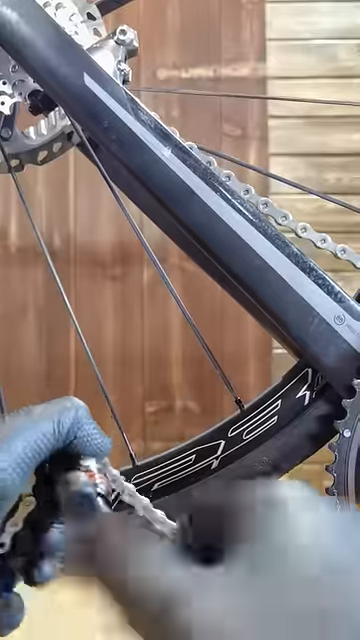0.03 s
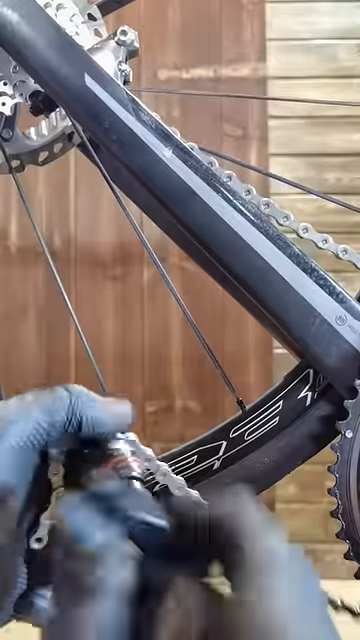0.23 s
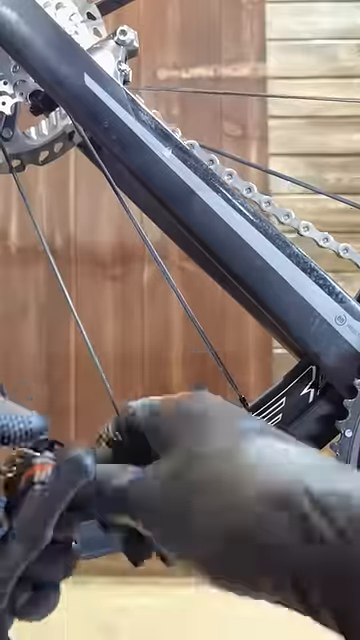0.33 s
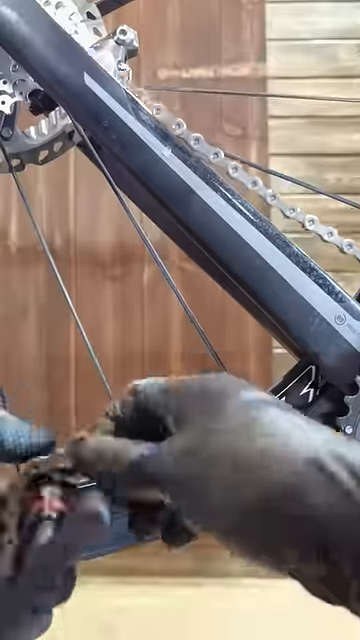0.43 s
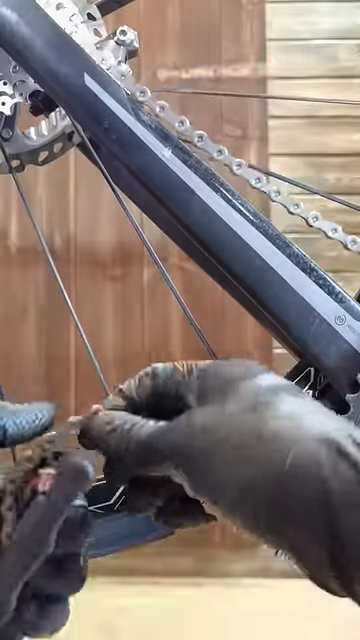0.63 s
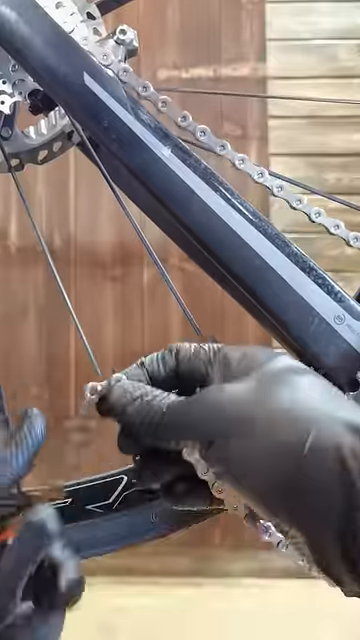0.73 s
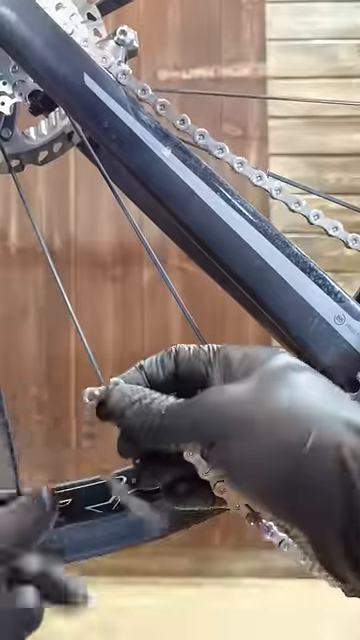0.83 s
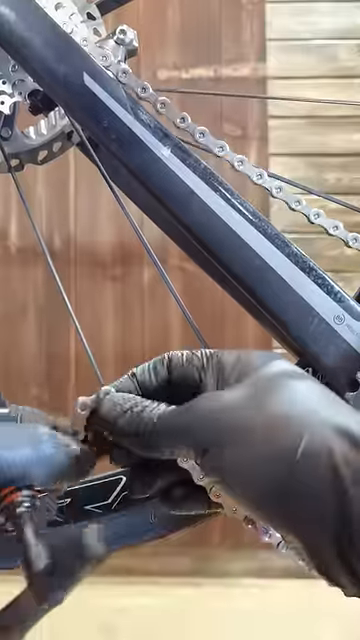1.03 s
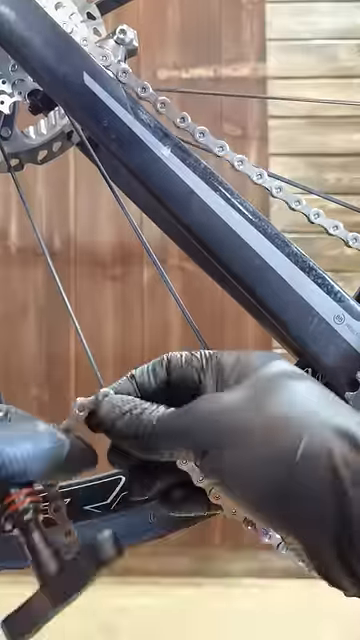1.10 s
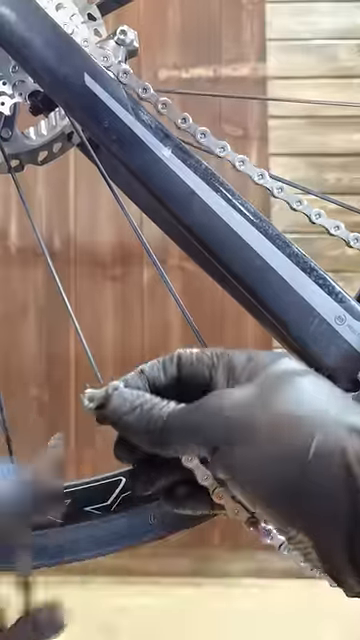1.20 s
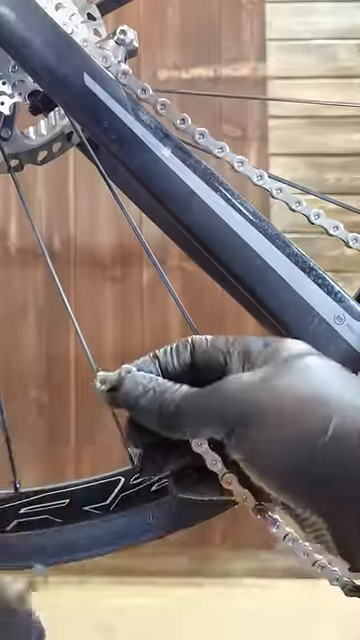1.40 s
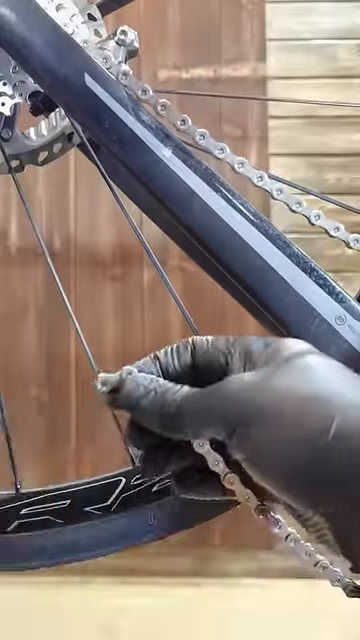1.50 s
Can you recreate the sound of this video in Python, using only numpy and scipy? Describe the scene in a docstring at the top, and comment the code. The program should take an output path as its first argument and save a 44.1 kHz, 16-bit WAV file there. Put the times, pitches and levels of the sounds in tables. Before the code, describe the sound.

A bicycle chain clacks sharply off a steel tool, then loose links tick faintly.

```python
"""A sharp clack, close by in a sheltered yard, as a bicycle chain snaps out of a steel chain tool.
The chain knocks the tool again and rattles off it; then loose links tick and gloves rub over the metal.
Each impact excites the resonant modes of the steel, while sliding friction makes a fine, gritty hiss.
The yard returns a short echo. Behind it a low hum swells and fades over faint rumble, drone and air."""
import sys
import numpy as np
from scipy import signal
from scipy.fft import rfft, irfft
from scipy.io import wavfile
from scipy.ndimage import uniform_filter1d

SR = 44100
rng = np.random.default_rng(int(sys.argv[2]) if len(sys.argv) > 2 else 0)


def unload_audio(sound):
    """Save the sound as a 16-bit wav file, at the path given as the first command line argument."""
    columns = np.transpose(np.atleast_2d(sound))
    # keep every value between -1 and 1, then stretch to whole-number steps
    steps = np.round(np.clip(columns, -1, 1) * 32767)
    wavfile.write(sys.argv[1], SR, steps.astype(np.int16))


N = 68355
TIME = np.arange(N) / SR
FREQS, SCENE_FREQS = np.fft.rfftfreq(4096, 1 / SR), np.fft.rfftfreq(N, 1 / SR)

# Spectrum of the outdoor air. Each row: frequency in Hz, relative spectral density in dB.
AIR_SPECTRUM = [(10, -2.5), (30, -0.5), (75, 0.5), (140, -6.5), (230, -6), (340, -10.5), (440, -9),
                (620, -16), (1000, -24.5), (2000, -29.5), (5000, -31), (16000, -34)]
# Envelopes of the air, the hum and the drone. Each row: time in seconds, relative level in dB.
AIR_ENVELOPE = [(0, -56.5), (.3, -61), (.55, -60), (.9, -64.5), (1.3, -62), (1.55, -63.5)]
HUM_ENVELOPE = [(0.0, -58.5), (0.056, -51), (0.09, -65.5), (0.164, -57), (0.202, -69.5), (0.224, -63),
                (0.43, -70), (0.556, -52), (0.69, -66), (0.75, -85), (0.798, -65.5), (0.876, -73.5),
                (0.936, -67), (0.984, -95), (1.074, -62), (1.16, -54.5), (1.364, -56.5), (1.55, -63)]
DRONE_ENVELOPE = [(0, -65), (.35, -77.5), (.5, -68.5), (.85, -72.5), (1.1, -77.5), (1.55, -73.5)]
# Reverberation time of the yard. Each row: frequency in Hz, T60 in seconds.
YARD_T60 = [(300, 0.14), (1500, 0.097), (4000, 0.41), (9000, .2), (16000, 0.099)]
# Strength of the yard's echo. Each row: frequency in Hz, gain in dB.
YARD_GAIN = [(300, 8.5), (1500, -7.5), (4000, -17.5), (9000, -16), (16000, -24)]
# Reflections off hands and frame. Each row: nominal delay in seconds, amplitude ratio.
NEAR_ECHOES = [(.0013, 0.28), (.0029, 0.21), (.0047, .22)]
# Colour shared by all metal contacts. Each row: frequency in Hz, gain in dB.
METAL_COLOUR = [(100, -33), (330, -21), (500, 6.5), (650, -2), (900, 2), (1400, -2), (1900, 2), (2300, 0.5),
                (3200, -2.5), (4600, -0.5), (5250, -6), (5700, -3), (8000, -6), (10700, -1.5), (11800, -7),
                (15500, -4)]
# Strokes of sliding chain and gloves.
# Each row: start in seconds, length in seconds, level in dB, centre in Hz, width in octaves.
SLIDES = [(-.02, 0.12, -56.5, 3000, 1.88), (0.038, 0.035, -55.5, 7460, 1), (0.06, 0.13, -62, 2830, 1.8),
          (0.176, 0.014, -48.5, 4030, 1.2), (0.186, 0.027, -45.5, 4116, 1.6),
          (0.256, 0.071, -44.5, 7000, 2.6), (0.278, 0.032, -41.5, 4960, 1.3),
          (.367, 0.041, -56.5, 5100, 3.7), (0.431, 0.1, -64, 8000, 1.32), (.655, 0.056, -60.5, 10420, 1.3),
          (0.798, 0.057, -64, 7940, 1.22), (0.869, 0.14, -70.5, 8020, 3.9),
          (1.004, 0.053, -54.5, 3200, 1.09), (1.034, 0.044, -60, 4920, 1.6),
          (1.084, 0.073, -60, 8850, 1.11), (1.504, 0.12, -70.5, 2194, 1.08)]
# Dull knocks of the tool in the hand. Each row: start in seconds, level in dB, pitch in Hz.
KNOCKS = [(.108, -53.5, 1800), (.183, -55, 1164), (.2405, -40.5, 2000), (.349, -58.5, 1960),
          (1.179, -54, 1996), (1.218, -52.5, 2296)]
# Modes of the gripped tool. Each row: ratio to the pitch, level in dB, time constant in seconds.
KNOCK_MODES = [(.40, -5, 0.0031), (.68, -11.5, 0.0024), (1, -2, 0.0026), (1.12, -6.5, .0015)]
# Modes of a loose link. Each row: frequency in Hz, level in dB, T60 in seconds.
LINK_MODES = [(2800, -14, 0.038), (4370, -20, 0.11), (5750, -5, .03), (7520, -13, .04), (9200, -4, 0.024),
              (10180, -8, 0.044), (11400, -13, .14), (13590, -6.5, 0.029)]
# Mode frequencies of tool and chain, in Hz.
STEEL_HZ = [510, 1020, 1180, 1667, 2033, 2372, 2840, 2877, 3290, 3628, 4267, 4447, 4930, 5655, 6655, 6895,
            7700, 7975, 8560, 9570, 10550, 10803, 13135, 14900]
# Ringing of those modes, in the same order. Each row: level in dB, T60 in seconds.
STEEL_RING = [(-55.5, 0.079), (-31, 0.053), (-38, 0.19), (-38.5, 0.053), (-32.5, 0.061), (-40.5, 0.13),
              (-34.5, 0.14), (-39, 0.13), (-33.5, 0.022), (-33.5, 0.068), (-29, 0.019), (-39, 0.076),
              (-29, 0.026), (-27.5, 0.031), (-27, 0.01), (-25.5, .035), (-23.5, 0.075), (-30, 0.068),
              (-29.5, 0.043), (-21.5, 0.049), (-20.5, 0.01), (-27.5, 0.043), (-25.5, 0.012), (-32.5, 0.045)]
STEEL_MODES = [(hz, db, t60) for hz, (db, t60) in zip(STEEL_HZ, STEEL_RING)]
# Contacts of loose links, and of the chain on the tool.
# Each row: start in seconds, level in dB, centre in Hz, width in octaves, chatter decay in seconds.
LINK_TICKS = [(.059, -46.5, 5230, 0.32, 0.006), (.4035, -44, 7440, 0.56, 0.0013),
              (.447, -51.5, 11030, 0.64, 0.0034), (.475, -48, 7850, .8, 0.0015),
              (.495, -52, 6040, 0.66, 0.0018), (.525, -59, 10150, 0.044, .008),
              (.642, -47, 9120, .6, 0.0043), (.6472, -38.5, 9960, 0.24, 0.0024),
              (.653, -49, 11900, 0.13, 0.0031), (.653, -57.5, 3040, 0.16, 0.018),
              (.6878, -43, 9090, 0.41, 0.0028), (.695, -56, 8000, 1.13, .002),
              (.7215, -45, 8060, 0.43, 0.0035), (.723, -53.5, 14700, .2, .003),
              (.850, -48, 6990, 0.37, .0015), (.857, -56, 7970, 0.57, 0.0017),
              (.929, -63.5, 5000, 1.56, .002), (1.024, -52, 4270, 0.34, 0.0058),
              (1.064, -55.5, 4463, 1.46, 0.0015), (1.173, -53.5, 14000, 0.73, 0.011)]
CHAIN_CLACKS = [(.1993, -30.5, 5640, 1.3, 0.012), (.2026, -20.5, 13400, 1.05, 0.0033),
                (.2045, -14.5, 8140, 0.81, 0.0019), (.2060, -14.5, 9214, 1.31, 0.0028),
                (.2077, -20, 3043, 1.6, 0.0016), (.2090, -16.5, 6955, 1.6, 0.0026),
                (.2106, -25.5, 2600, 1.2, 0.0019), (.2805, -27.5, 3070, 1.7, 0.00035),
                (.2812, -28, 1670, 0.53, .0007), (.2822, -33, 14850, 0.24, 0.0016),
                (.2841, -29, 7160, 0.42, 0.0041), (.2893, -18.5, 3790, 0.69, 0.0003),
                (.2902, -35.5, 1110, 2.05, 0.0081), (.302, -35, 10500, 0.045, 0.0032),
                (.313, -36, 8600, 0.67, 0.0026), (.3225, -39, 6040, 0.91, 0.001)]
# Hard blows that ring the tool. Each row: start in seconds, level in dB, centre in Hz, width in octaves.
HARD_BLOWS = [(.2050, -1, 7000, 3.7), (.2893, -7.5, 1700, 0.58)]


def amp(db):
    """Amplitude ratio of a level in decibels."""
    return 10 ** (np.asarray(db) / 20)


def unit(x):
    """Normalisation to unit RMS."""
    return x / np.sqrt(np.mean(x ** 2) + 1e-20)


def envelope(points):
    """Amplitude over time, interpolated in decibels."""
    return amp(np.interp(TIME, *np.transpose(points)))


def curve_at(points, hz):
    """Interpolation on a logarithmic frequency axis."""
    f, value = np.transpose(points)
    return np.interp(np.log(hz + 1), np.log(f + 1), value)


def bell(f, hz, octaves):
    """Gaussian passband in log frequency, centred on hz."""
    return np.exp(-.5 * (np.log2((f + 1) / hz) / octaves) ** 2)


def add(mix, start, sound):
    """Superposition of a stereo sound on the mix, from a start in seconds."""
    at = round(start * SR)
    sound = sound[:, max(-at, 0):]
    part = mix[:, max(at, 0):][:, :sound.shape[1]]
    part += sound[:, :part.shape[1]]


def colour(x, gain):
    """Minimum-phase filtering by a gain over FREQS, normalised to unit power."""
    log_gain = np.log(np.maximum(unit(gain), 1e-4))
    log_response = signal.hilbert(np.r_[log_gain, log_gain[-2:0:-1]]).conj()
    taps = np.fft.ifft(np.exp(log_response)).real
    return signal.fftconvolve(x, taps[None], axes=1)


def stereo_noise(size, bass_coherence=0.84, corner_hz=2200):
    """Interaural coherence falls with frequency: noise alike in the bass, unrelated in the treble."""
    left, independent = rfft(rng.standard_normal((2, size)))
    coherence = bass_coherence / (1 + (np.fft.rfftfreq(size, 1 / SR) / corner_hz) ** 2)
    right = coherence * left + np.sqrt(1 - coherence ** 2) * independent
    return irfft(np.array([left, right]), size)


def shaped_noise(gain):
    """Spectral shaping of stereo noise by a gain over SCENE_FREQS, at unit RMS."""
    return unit(irfft(rfft(stereo_noise(N)) * gain, N))


def air():
    """Broadband outdoor noise whose spectral density falls toward the treble."""
    return envelope(AIR_ENVELOPE) * shaped_noise(amp(curve_at(AIR_SPECTRUM, SCENE_FREQS)))


def rumble(stereo_width=.35):
    """Deep narrowband noise; a small interaural difference keeps it near the centre."""
    band = amp(-64.5) * shaped_noise(bell(SCENE_FREQS, hz=48, octaves=.14))
    mid = band.mean(0)
    return mid + stereo_width * (band - mid)


def drone():
    """Noise confined to a very narrow band is heard as a faint pitch."""
    return envelope(DRONE_ENVELOPE) * shaped_noise(bell(SCENE_FREQS, hz=428, octaves=.03))


def hum(pitch_hz=109.1, waver=0.004, fundamental_gain_db=2, overtone_db=-77.5):
    """Slow random frequency modulation makes a swelling low tone and its faint octave waver."""
    drift = unit(irfft(rfft(rng.standard_normal(N)) * bell(SCENE_FREQS, hz=5, octaves=0.94), N))
    phase = 2 * np.pi * np.cumsum(pitch_hz * (1 + waver * drift)) / SR
    fundamental = amp(fundamental_gain_db) * envelope(HUM_ENVELOPE) * np.sin(phase)
    return np.sqrt(2) * (fundamental + amp(overtone_db) * np.sin(2 * phase))


def yard_echo(x, rise_s=.004):
    """Diffuse reverberation from fence and shed: each band decays exponentially at its own rate."""
    hz, t, bands = signal.stft(stereo_noise(16384), SR, nperseg=256)
    t60 = curve_at(YARD_T60, hz)[:, None]
    decay = amp(curve_at(YARD_GAIN, hz)[:, None] - 60 * t / t60)
    energy_scale = np.sqrt(2 * np.log(1000) / (t60 * SR))  # long and short decays carry equal energy
    tail = signal.istft(bands * decay * energy_scale, SR, nperseg=256)[1]
    tail *= np.minimum(TIME[:tail.shape[1]] / rise_s, 1)
    return signal.fftconvolve(x, tail, axes=1)[:, :N]


def with_reflections(x, delay_spread=0.17):
    """Early reflections off hands and frame join the direct sound, by a different path to each ear."""
    out = x.copy()
    for delay, share in NEAR_ECHOES:
        for ear in np.eye(2):
            add(out, delay * (1 + delay_spread * rng.uniform(-0.79, 1)), share * ear[:, None] * x)
    return out


def metal_response(modes, half_width_hz=44, widening=0.011, valley_db=-4):
    """Resonance gives a metal part's gain over FREQS a Lorentzian peak at each mode."""
    peaks = sum(1 / (1 + ((FREQS - hz) / (half_width_hz + widening * hz)) ** 2) for hz, _, _ in modes)
    return amp(curve_at(METAL_COLOUR, FREQS)) * np.sqrt(peaks + amp(valley_db) ** 2)


def slides(catches_per_s=1000, spread_db=0.5, hiss=0.66, size=8192):
    """Sliding friction: dense tiny catches and a hiss drive the resonances of the steel."""
    out, response = np.zeros((2, N)), metal_response(STEEL_MODES)
    for start, length, db, hz, octaves in SLIDES:
        catches = rng.random(size) < catches_per_s / SR
        strength = amp(spread_db * np.minimum(rng.exponential(1, size), 4))
        grit = unit(catches * strength * rng.standard_normal((2, size)))
        friction = unit(grit + hiss * stereo_noise(size))
        stroke = np.sin(np.pi * np.minimum(TIME[:size] / length, 1))
        add(out, start, amp(db) * colour(friction * stroke, bell(FREQS, hz, octaves) * response))
    return out


def pulse(t, peak_s):
    """Critically damped envelope: it rises to one at peak_s, then dies away."""
    return t / peak_s * np.exp(1 - t / peak_s)


def knocks(rub_db=-7.5, rub_s=.003):
    """Damping: the gripped tool's modes die quickly, leaving a dull knock with a short rub."""
    out, t = np.zeros((2, N)), TIME[:2048]
    for start, db, hz in KNOCKS:
        tone = sum(amp(level) * pulse(t, peak_s) * np.sin(2 * np.pi * hz * ratio * t)
                   for ratio, level, peak_s in KNOCK_MODES)
        add(out, start, amp(db) * np.array([tone, tone]))
        rub = stereo_noise(len(t)) * pulse(t, rub_s)
        add(out, start, amp(db + rub_db) * colour(rub, bell(FREQS, 0.59 * hz, octaves=.5)))
    return out


def contacts(hits, modes, crack=0.12, rise_s=.0003):
    """Forced response: a crack and a brief chatter of steel on steel pass through the resonances."""
    out, t, response = np.zeros((2, N)), TIME[:2048], metal_response(modes)
    for start, db, hz, octaves, decay in hits:
        chatter = stereo_noise(len(t)) * np.exp(-t / decay) * (1 - np.exp(-t / rise_s))
        chatter /= np.linalg.norm(chatter, axis=1, keepdims=True)
        chatter[:, 0] += crack  # impulse at first touch
        chatter *= np.sqrt(decay * SR / 2)  # longer chatter carries more energy
        add(out, start, amp(db) * colour(chatter, bell(FREQS, hz, octaves) * response))
    return out


def ringing(hits, modes, rise_s=0.0014, left_ear_delay_s=.00005):
    """Free vibration: each hit leaves the modes near its centre frequency as decaying sinusoids."""
    out = np.zeros((2, N))
    t = np.maximum(TIME[:SR // 2] - np.array([[left_ear_delay_s], [0]]), 0)
    for start, db, centre, octaves, *_ in hits:
        tone = sum(bell(hz, centre, octaves) * amp(level - 60 * t / t60) * np.sin(2 * np.pi * hz * t)
                   for hz, level, t60 in modes)
        add(out, start, amp(db) * tone * np.minimum(t / rise_s, 1))
    return out


def loose_links():
    """Light impacts excite the high modes of a small link, heard as ticks."""
    return contacts(LINK_TICKS, LINK_MODES) + ringing(LINK_TICKS, LINK_MODES)


def chain_on_tool():
    """Impact excitation: the freed chain clatters on the tool, and two hard blows set it ringing."""
    return contacts(CHAIN_CLACKS, STEEL_MODES) + ringing(HARD_BLOWS, STEEL_MODES)


def scene(handling_echo_db=-4.5):
    """Superposition of the background, the yard's echo and the direct sound of the metal."""
    clacks = chain_on_tool()
    handling = loose_links() + with_reflections(knocks() + slides())
    echo = yard_echo(clacks + amp(handling_echo_db) * handling)
    return hum() + rumble() + air() + drone() + echo + handling + clacks


def record(dry, split_hz=340, threshold_db=-48, depth_db=9, window_s=0.007, cutoff_hz=15720):
    """Downward expansion: a noise suppressor lowers the upper band when it is quiet; a low-pass follows."""
    low = signal.sosfiltfilt(signal.butter(2, split_hz, fs=SR, output="sos"), dry)
    high = dry - low
    power = uniform_filter1d((high ** 2).mean(0), int(window_s * SR))
    level_db = 10 * np.log10(abs(power) + 1e-14)
    gated = low + high * amp(-np.clip(threshold_db - level_db, 0, depth_db))
    lowpass = signal.firwin(511, cutoff_hz, window=("kaiser", 5), fs=SR)
    return signal.oaconvolve(gated, lowpass[None], "same")


dry = scene()
out = record(dry)
unload_audio(out)
```